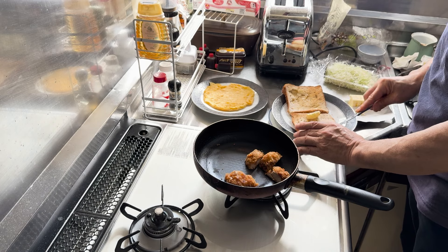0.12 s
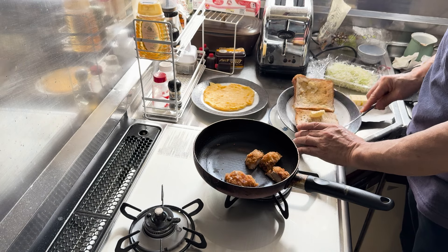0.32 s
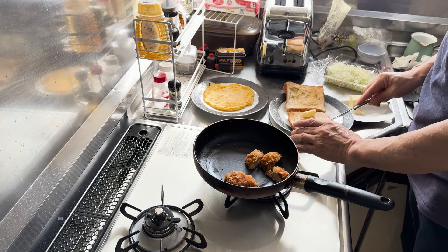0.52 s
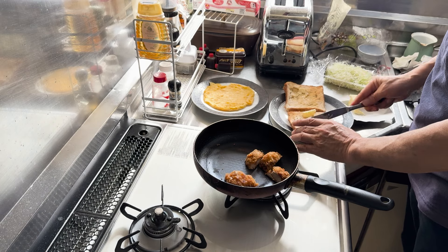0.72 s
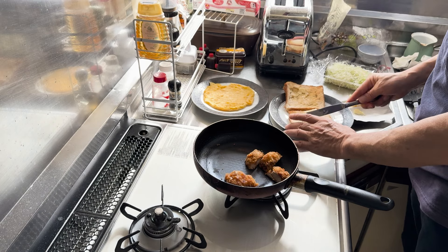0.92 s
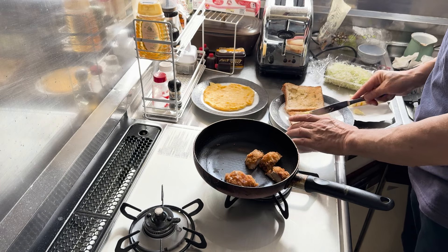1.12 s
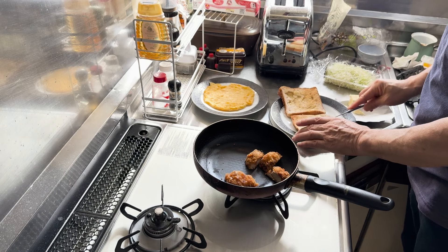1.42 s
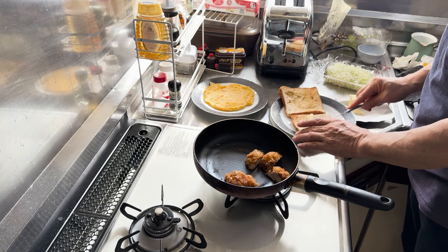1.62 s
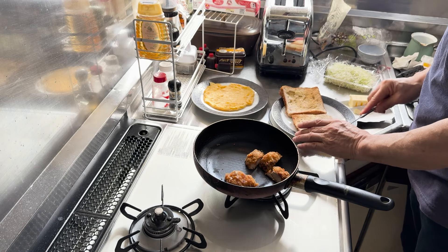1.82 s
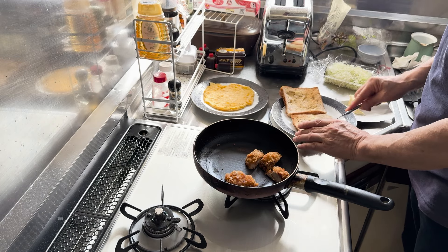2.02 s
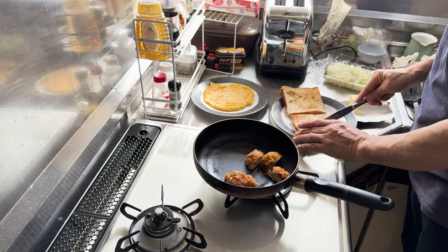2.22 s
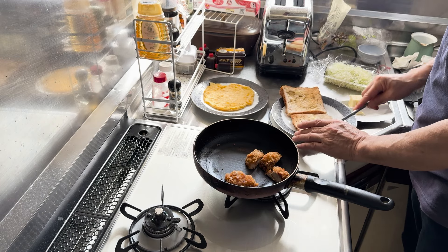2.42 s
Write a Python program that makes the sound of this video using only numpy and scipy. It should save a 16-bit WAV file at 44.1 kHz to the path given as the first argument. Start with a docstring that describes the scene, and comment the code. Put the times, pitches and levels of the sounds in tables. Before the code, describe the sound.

A table knife scrapes across crisp toast with a dry crackle, close by in a small kitchen. From about 0.2 to 0.4 seconds something hard clatters loudly onto the counter, ringing and thudding. Short, scratchy strokes return from 0.8 to 1.8 seconds and again near 2.4. The knife lightly taps a plate between 1.3 and 2.5 seconds, clearest near 1.9. Soft worktop thuds and a low hum lie underneath.

```python
"""Knife on toast

A table knife spreads over crisp toast in a small, hard-walled kitchen: crust grains crackle, the blade
sticks and slips. Early on something hard clatters onto the counter and rings it. Later the knife knocks
lightly on the dishes, ringing plate and blade. Soft worktop thuds and a low hum lie underneath."""
import sys
import numpy as np
from scipy import signal
from scipy.fft import rfft, irfft
from scipy.io import wavfile

SR = 44100
rng = np.random.default_rng(int(sys.argv[2]) if len(sys.argv) > 2 else 0)


def log_audio(samples):
    """Write samples as a 16-bit WAV file to the path given in sys.argv[1]."""
    # one column per channel
    frames = np.atleast_2d(samples).T
    # limit to full scale, then quantise
    limited = np.clip(frames, -1, 1)
    pcm = np.round(limited * 32767).astype(np.int16)
    wavfile.write(sys.argv[1], SR, pcm)


N = 114660


def amp(db):
    """Decibels to gain."""
    return 10 ** (np.asarray(db) / 20)


def unit(x):
    """Scale to rms 1."""
    return x / np.sqrt(np.mean(x ** 2))


def colour(x, points):
    """Minimum-phase filter through (frequency [Hz], gain [dB]) points."""
    size = 2 * N
    hz, db = np.array(points, float).T
    f = np.maximum(np.fft.rfftfreq(size, 1 / SR), 1)
    gain = amp(np.interp(np.log(f), np.log(hz), db))
    cepstrum = irfft(np.log(gain))
    cepstrum[1:N] *= 2
    cepstrum[N + 1:] = 0
    return irfft(rfft(x, size) * np.exp(rfft(cepstrum)))[..., :N]


def resonate(x, hz, width_hz):
    """One resonance, unity gain at its centre."""
    return signal.lfilter(*signal.iirpeak(hz, hz / width_hz, fs=SR), x)


def ring(x, modes, gain_db):
    """An object's modes, driven by contact x."""
    return sum(amp(gain_db + db) * resonate(x, hz, width_hz) for hz, width_hz, db in modes)


def grains(per_s, spread_db):
    """Dense random clicks, a few larger than the rest; rms 1."""
    size = amp(spread_db * np.minimum(rng.exponential(size=N), 4))
    sign = rng.choice([-1, 1], N)
    return unit(size * sign * (rng.random(N) < per_s / SR))


def wander(per_s):
    """Random levels joined by ramps; spread near 1."""
    steps = np.arange(N) / SR * per_s
    count = int(steps[-1]) + 2
    return np.interp(steps, np.arange(count), rng.standard_normal(count))


def swings(table, attack_s):
    """One damped sine per push."""
    out = np.zeros(N)
    for start, db, hz, decay_s in table:
        age = np.maximum(np.arange(N) / SR - start, 0)
        envelope = (1 - np.exp(-age / attack_s)) * np.exp(-age / decay_s)
        out += amp(db) * envelope * np.sin(2 * np.pi * hz * age)
    return out


# rumble spectrum (frequency [Hz], relative density [dB])
RUMBLE_SPECTRUM = [(21, -17), (46, -5), (105, -2), (210, -17), (410, -24), (1050, -30), (2550, -52),
                   (6100, -50), (15100, -54.5)]
# hum lines (frequency [Hz], rms level [dB])
HUM_LINES = [(247.6, -70.5), (296, -68.5)]
def background(rumble_db=-56.5, side_cut_hz=850):
    """Room rumble, near mono in the bass, and appliance hum."""
    t = np.arange(N) / SR
    mid, side = unit(colour(rng.standard_normal((2, N)), RUMBLE_SPECTRUM))
    side = signal.sosfilt(signal.butter(1, side_cut_hz, "high", fs=SR, output="sos"), side)
    hum = sum(amp(db) * np.sqrt(2) * np.sin(2 * np.pi * (hz * t + rng.random())) for hz, db in HUM_LINES)
    return amp(rumble_db) * np.array([mid + side, mid - side]) + hum


# crust crackle spectrum (frequency [Hz], relative density [dB])
CRUST_SPECTRUM = [(300, -12.5), (1200, -2.5), (2500, -3.5), (4000, -2.5), (6000, -3), (8200, -2),
                  (12000, -3.5), (15500, 5)]
# steel blade modes (frequency [Hz], width [Hz], relative gain [dB])
BLADE_RING = [(3250, 41, -2), (3540, 39, -6.5), (5020, 75, -10), (6114, 42, 0.5), (7340, 230, -1),
              (8200, 45, 6), (11700, 330, -3)]
# strokes (time [s], attack [s], hold [s], release [s], crackle gain [dB], rub gain [dB], rub centre [Hz])
TOAST_STROKES = [(0.002, 0.00043, 0.0091, 0.12, -61.5, -74, 1160),
                 (0.122, 0.0048, 0.14, 0.035, -56.5, -72.5, 1546),
                 (0.844, 0.0048, 0.05, 0.036, -64, -65, 1126),
                 (0.992, 0.022, 0.024, 0.011, -70, -52.5, 890),
                 (1.002, 0.019, 0.017, 0.025, -63.5, -56.5, 402),
                 (1.085, 0.07, 0.026, 0.067, -59.5, -64.5, 1386),
                 (1.192, 0.0075, .016, .0065, -71, -53.5, 1570),
                 (1.343, 0.0061, 0.063, 0.023, -57, -67.5, 1545),
                 (1.699, 0.023, 0.027, 0.011, -60.5, -56, 1150),
                 (1.742, 0.0046, 0.0068, 0.05, -49.5, -59.5, 2250),
                 (2.441, 0.025, 0.019, 0.012, -56.5, -68, 2093),
                 (2.59, 0.0039, 0.021, 0.024, -61.5, -79, 1550)]
def spreading(gain_db=-0.5, uneven_db=3):
    """The blade breaks grains of uneven crust, sticks and slips on the bread, and rings."""
    t, out = np.arange(N) / SR, np.zeros(N)
    crackle = unit(colour(grains(per_s=10000, spread_db=6), CRUST_SPECTRUM))
    slips = grains(per_s=340, spread_db=0.58)
    for start, attack_s, hold_s, release_s, crackle_db, rub_db, hz in TOAST_STROKES:
        rise = np.clip((t - start) / attack_s, 0, 1)
        fall = np.exp(-np.maximum(t - start - attack_s - hold_s, 0) / release_s)
        rub = resonate(slips, hz, width_hz=0.7 * hz)
        rub = unit(resonate(rub, hz, width_hz=hz))
        out += rise * fall * (amp(crackle_db) * crackle + amp(rub_db) * rub)
    out *= amp(uneven_db * wander(per_s=70))
    return amp(gain_db) * (out + ring(out, BLADE_RING, gain_db=7))


# blow bands, bass to top (low edge [Hz], high edge [Hz])
BANDS_HZ = [(80, 300), (300, 900), (900, 2400), (2400, 9000), (10500, 15000)]
def blow_spectrum(levels_db, span_s=0.035, sub_db=-8, top_db=-16.5):
    """Band levels over span_s to filter points, rolled off at both ends."""
    lo, hi = np.array(BANDS_HZ).T
    density_db = np.array(levels_db) + 10 * np.log10(span_s * SR ** 2 / (2 * (hi - lo)))
    sub = [(25, density_db[0] + 2 * sub_db), (80, density_db[0] + sub_db)]
    top = [(13300, density_db[-1]), (15500, density_db[-1] + top_db)]
    return [*sub, *zip(np.sqrt(lo * hi), density_db), *top]


def blows(table, modes, ring_db, crossover_hz=410, graze_db=-17, graze_max_s=0.0039):
    """Surfaces graze, then meet in a brief rattle; one push carries the bass and rings the modes."""
    t, out = np.arange(N) / SR, np.zeros((2, N))
    low, high = (signal.butter(2, crossover_hz, kind, fs=SR, output="sos") for kind in ("low", "high"))
    for start, *levels_db, rattle_s in table:
        age = np.maximum(t - start, 0) / rattle_s
        graze = amp(graze_db) * np.exp(-np.abs(t - start) / min(graze_max_s, 2 * rattle_s))
        rattle = grains(per_s=2500, spread_db=1.4) * (graze + age * np.exp(-age))
        rattle /= np.sqrt(np.sum(rattle ** 2) + 1e-9)
        push = signal.unit_impulse(N, int((start + rattle_s / 2) * SR))
        contact = signal.sosfilt(low, push) + signal.sosfilt(high, rattle)
        out += colour(np.array([contact, push]), blow_spectrum(levels_db))
    contacts, pushes = out
    return contacts + ring(pushes, modes, ring_db)


# object and counter modes (frequency [Hz], width [Hz], relative gain [dB])
COUNTER_RING = [(141, 17, -2), (251.2, 23, -1.5), (538, 62, -11.5), (1278, 40, -8.5), (1786, 100, -3),
                (2437, 47, -5.5), (3000, 19, -1), (3180, 79, 3), (4530, 28, -3.5), (5820, 38, -2),
                (8160, 79, 8), (12130, 40, 4.5), (13110, 32, 9)]
# blows, relative levels (time [s], bass [dB], low-mid [dB], mid [dB], treble [dB], top [dB], rattle [s])
COUNTER_BLOWS = [(.2275, -38, -29, -31, -27.5, -35.5, 0.0034),
                 (.242, -41, -30.5, -34, -31.5, -51.5, 0.0014),
                 (.2725, -32, -31.5, -29, -39, -39.5, 0.00093), (.2762, -31, -26, -27, -33, -32.5, 0.00034),
                 (.280, -23, -23, -37.5, -48, -51.5, 0.0017), (.301, -28.5, -33.5, -29, -34, -42, .005),
                 (.3335, -35, -38, -20, -15.5, -27.5, 0.00079), (.339, -43.5, -29.5, -18, -28, -27, .0012),
                 (.356, -28.5, -26, -25.5, -28.5, -34.5, 0.0023),
                 (.370, -30.5, -26.5, -20, -32.5, -42, .001), (.401, -42, -36, -22, -22, -37, 0.00281),
                 (.424, -49.5, -34, -23, -25, -37, .004)]
def clatter(gain_db=-5.5):
    """A hard object clatters onto the counter; both ring."""
    return amp(gain_db) * blows(COUNTER_BLOWS, COUNTER_RING, ring_db=5)


# edge contacts (time [s], gain [dB], frequency [Hz], decay [s])
EDGE_CLACKS = [(.228, -17.5, 1214, 0.013), (.241, -14.5, 1485, 0.011), (.338, -20.5, 1232, 0.015),
               (.428, -21, 2640, 0.016), (1.661, -38.5, 891, 0.016), (2.427, -36.5, 2490, 0.0085),
               (2.524, -48, 1607, 0.03)]
def clacks():
    """Edge contacts of the object, later the knife, each bring out one pitch."""
    return swings(EDGE_CLACKS, attack_s=0.006)


# thuds (time [s], gain [dB], frequency [Hz], decay [s])
WORKTOP_THUDS = [(.276, -28, 59.3, 0.063), (.279, -19, 150.9, 0.057), (.352, -23, 151, 0.029),
                 (0.734, -39.5, 74, 0.068), (1.336, -33, 40, 0.049), (1.551, -39.5, 57.9, 0.041),
                 (1.676, -37.5, 47.4, 0.039), (1.83, -42.5, 49.6, 0.097), (2.405, -32.5, 47.8, 0.031)]
def thuds():
    """Soft pushes swing low resonances of the worktop."""
    return swings(WORKTOP_THUDS, attack_s=0.017)


# plate modes (frequency [Hz], width [Hz], relative gain [dB])
PLATE_RING = [(148, 13.7, 1.5), (383, 31, -7), (817, 9.1, -6.5), (1560, 7.1, -10), (1624, 13, -6.5),
              (1866, 53, -3.5), (2225, 35, -9.5), (2672, 23, 0.5), (3230, 34, -5), (3760, 24, -9)]
# broad tone of knife and dish (frequency [Hz], gain [dB])
KNOCK_TONE = [(200, -4.5), (430, 3.5), (700, -2.5), (1200, -3), (1900, 0.5), (2600, 0), (4300, -4.5),
              (8000, -5.5), (11000, -14)]
# knocks, relative levels (time [s], bass [dB], low-mid [dB], mid [dB], treble [dB], top [dB], rattle [s])
KNIFE_KNOCKS = [(1.349, -53, -56, -50.5, -56, -51, 0.0011), (1.533, -54, -55.5, -51, -71, -123, 0.0044),
                (1.659, -45.5, -45.5, -38.5, -43, -61.5, 0.00547), (1.729, -50, -50, -53, -56, -90, 0.0047),
                (1.750, -69, -47.5, -55, -44.5, -37, 0.0028), (1.846, -55.5, -47, -34.5, -49, -88, 0.00412),
                (1.8595, -39.5, -43.5, -28.5, -35, -40, .0014),
                (2.0595, -58.5, -46, -38, -52.5, -66.5, 0.0019), (2.425, -46, -50, -42, -46, -65, 0.003),
                (2.519, -62.5, -48, -43, -68, -89, 0.0017)]
def knocks(gain_db=-5.5):
    """The knife taps a dish; plate and blade ring."""
    dish = amp(gain_db) * colour(blows(KNIFE_KNOCKS, PLATE_RING, ring_db=7), KNOCK_TONE)
    return dish + ring(dish, BLADE_RING, gain_db=4)


def reverb_envelope(t60_s, build_s):
    """Reflections build up, then die away exponentially."""
    t, decay_per_s = np.arange(N) / SR, np.log(1000) / t60_s
    return (1 - np.exp(-t / build_s)) * np.exp(-decay_per_s * t) * np.sqrt(2 * decay_per_s / SR)


# room bands (centre [Hz], direct [dB], early t60 [s], relative late gain [dB], late t60 [s],
# left-right coherence [0-1], left minus right [dB])
ROOM_BANDS = [(73.4, -5.5, 0.24, 3.5, 1.9, .95, -0.5), (149, -15.5, 0.19, -4, 1.53, 0.94, 3),
              (320, -4.5, 0.2, -10.5, 2, 0.8, 1.6), (660, -8, 0.26, -12, 1.5, 0.4, -1),
              (1440, -0.5, .13, -20.5, 1.1, 0, 2), (3560, -9.5, 0.18, -23.5, .95, 0, -3.8),
              (6540, -4.5, .13, -16.5, .58, .05, -1.5), (13200, 1.5, .14, -29, .33, 1, 0.1)]
def kitchen(x, tail_db, early_db=4, right_lag_s=2.1e-5):
    """Direct sound, dense reflections off steel and tile, and a longer dull tail."""
    f = np.maximum(np.fft.rfftfreq(N, 1 / SR), 1)
    log_centres = np.log([row[0] for row in ROOM_BANDS])
    mid, side = rfft(rng.standard_normal((2, N)))
    sides, response = np.array([[1], [-1]]), 0
    for one_band, row in zip(np.eye(len(ROOM_BANDS)), ROOM_BANDS):
        _, _, early_s, late_db, late_s, coherence, pan_db = row
        band = np.interp(np.log(f), log_centres, one_band)
        stereo = np.sqrt((1 + coherence) / 2) * mid + sides * np.sqrt((1 - coherence) / 2) * side
        early = amp(early_db) * reverb_envelope(early_s, build_s=0.00094)
        late = amp(late_db + tail_db) * reverb_envelope(late_s, build_s=0.011)
        response += irfft(band * stereo, N) * (early + late) * amp(sides * pan_db / 2)
    direct = [colour(x, [(hz, db + s * pan_db / 2) for hz, db, *_, pan_db in ROOM_BANDS])
              for s in (1, -1)]
    left, right = np.array(direct) + signal.fftconvolve(x[None], response, axes=1)[:, :N]
    right = irfft(rfft(right) * np.exp(-2j * np.pi * f * right_lag_s), N)
    return np.array([left, right])


def scene():
    """Clatter and the closer knife reverberate; clacks, thuds and background stay dry."""
    counter = clatter()
    knife = knocks() + spreading()
    room = kitchen(counter, tail_db=1.5) + kitchen(knife, tail_db=1)
    return room + clacks() + thuds() + background()


# microphone response (frequency [Hz], gain [dB])
MIC_RESPONSE = [(20, 3.5), (6100, 0), (8500, -2), (9150, -7), (9750, -29), (10350, -10.5), (11150, -3.5),
                (12150, 3.5), (13400, -3), (14750, -10.5), (15650, -7), (16600, -29.5)]
def record(dry, cutoff_hz=16500):
    """The microphone colours the sound and cuts the top."""
    lowpass = signal.ellip(8, .2, 70, cutoff_hz, fs=SR, output="sos")
    return signal.sosfilt(lowpass, colour(dry, MIC_RESPONSE))


dry = scene()
out = record(dry)
log_audio(out)
```